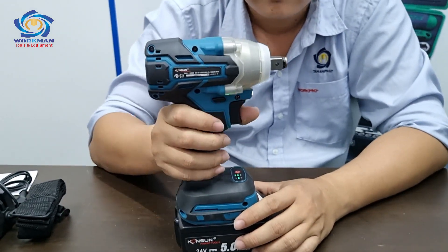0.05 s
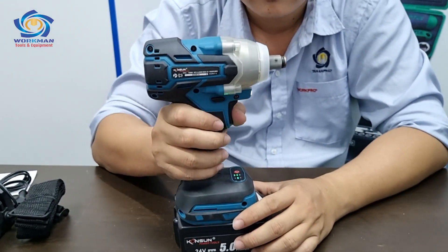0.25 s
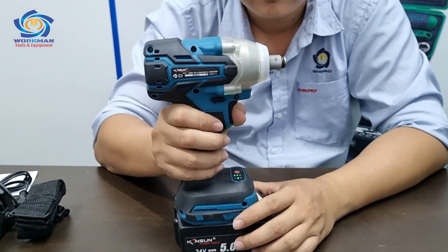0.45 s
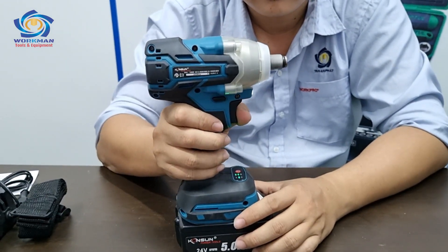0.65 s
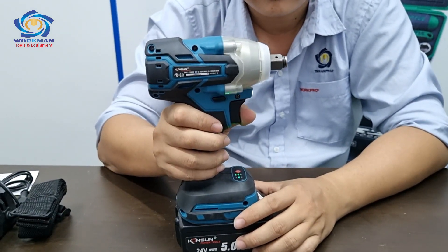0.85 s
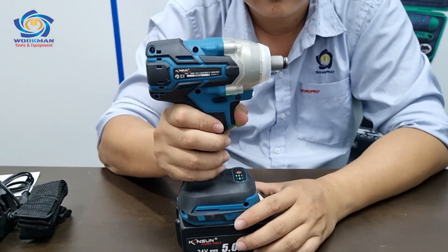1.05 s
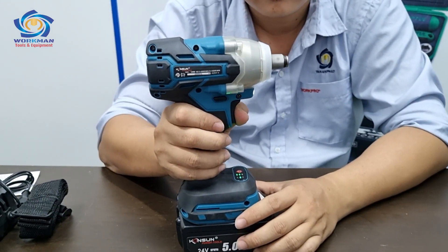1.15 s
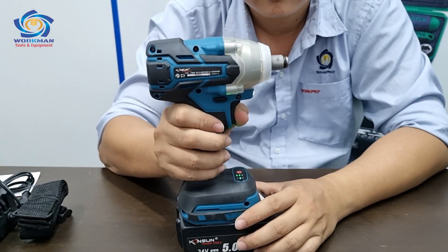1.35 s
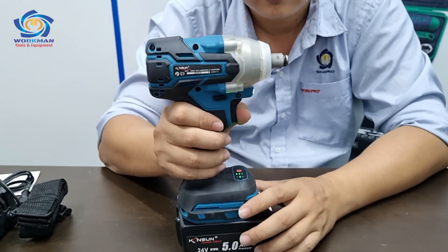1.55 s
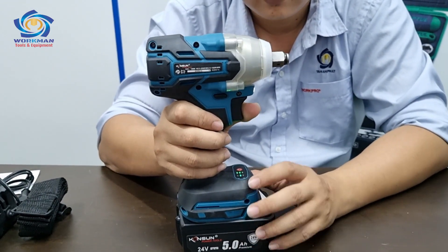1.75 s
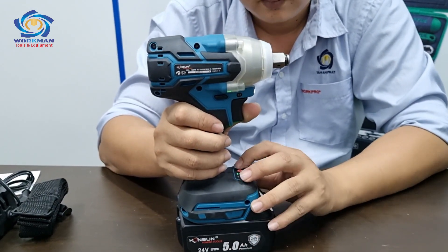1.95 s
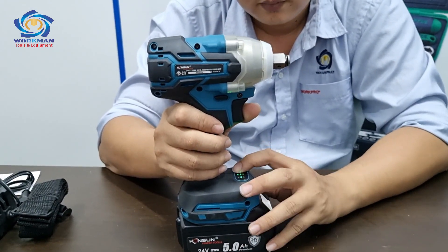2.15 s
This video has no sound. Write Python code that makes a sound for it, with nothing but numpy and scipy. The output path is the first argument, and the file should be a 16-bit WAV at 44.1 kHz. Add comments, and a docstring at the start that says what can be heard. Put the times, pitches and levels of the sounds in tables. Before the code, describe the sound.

A cordless impact wrench close to the microphone in a small room runs twice unloaded: tick, jerk, loud steel clack, rising whine with gear rattle, then a growling brake; the second run lasts longer.

```python
"""In a small room, close by over a table, a cordless impact wrench is run twice without load.
Each pull: the drive ticks, the motor jerks and winds up, and the hammer clacks once on the anvil.
Gears whine and rattle at full speed, then the brake growls and the motor coasts out.
Tones follow the rotor angle, rattle and scrapes are coloured noise, blows are decaying modes.
Below lie room noise, a faint hum and a swelling low rumble."""
import sys
import numpy as np
from scipy import signal
from scipy.fft import rfft, irfft
from scipy.io import wavfile

SR = 44100
rng = np.random.default_rng(int(sys.argv[2]) if len(sys.argv) > 2 else 0)


def pcm_store(signal):
    """Save signal as 16-bit PCM."""
    levels = np.round(np.clip(np.atleast_2d(signal), -1, 1) * 32767)
    wavfile.write(sys.argv[1], SR, levels.astype(np.int16).T)


N = 97020
T = np.arange(N) / SR  # seconds

# Background noise. Each row: frequency in Hz, relative density in dB per Hz.
FLOOR_SPECTRUM = [(26, -30), (60, -9), (190, -2.5), (450, -9), (800, -19.5), (3200, -37), (8300, -48.5),
                  (9400, -42), (10500, -48.5), (16000, -55.5)]
FLOOR_DB, HUM_HZ, HUM_DB = -41.5, 99, -52.5
# Low rumble. Each row: frequency in Hz, relative density in dB per Hz.
RUMBLE_SPECTRUM = [(30, -43), (48, -7), (70, -2.5), (105, -2), (150, -18), (900, -77)]
# Swells of the rumble. Each row: middle in seconds, half width in seconds, rise above its base in dB.
RUMBLE_SWELLS = [(.05, 0.082, 3), (.56, 0.47, 9.5), (.79, 0.029, 6.5), (1.08, 0.11, 5.5),
                 (1.29, 0.088, 11.5), (1.56, 0.11, 6.5), (2.058, 0.056, 11), (2.16, 0.021, 8)]
RUMBLE_DB, DRONE_DB = -47, -49.5  # base levels, before the swells
DRONE_HZ, DRONE_WANDER = 71.64, .038  # centre pitch, rms wander as a fraction of it

# Room tail. Each row: frequency in Hz, decay time by 60 dB in seconds.
ROOM_DECAY = [(200, 0.53), (2000, 0.69), (9000, 0.3)]
ROOM_DB, CLACK_ROOM_DB, ROOM_DELAY_S = -13.5, -20, .011

# Motor windings pulsed by the drive. Each row: start in seconds, level in dB.
DRIVE_TICKS = [(.2300, -28.5), (0.2355, -27), (0.969, -27), (0.9735, -24.5)]
# Modes of the windings. Each row: frequency in Hz, relative level in dB, decay time by 60 dB in seconds.
WINDING_MODES = [(3560, -4, 0.0055), (8130, -5, 0.0071), (9100, -8, 0.012), (13200, -6.5, 0.0045)]
# Gears taking up their slack. Each row: start in seconds, level in dB.
GEAR_JERKS = [(0.2384, -26), (0.2475, -28.5), (0.9804, -22.5)]
# Modes of the gearcase. Each row: frequency in Hz, relative level in dB, decay time by 60 dB in seconds.
GEARCASE_MODES = [(121, -1.5, 0.055), (388, 2.5, 0.0177), (2520, 1.5, 0.023)]

# Gear teeth grinding under torque. Each row: frequency in Hz, relative density in dB per Hz.
GRIND_SPECTRUM = [(90, -14.5), (200, 6), (800, 1), (1100, -3), (2100, -7), (2700, 0), (4500, -6.5),
                  (5500, -17), (13000, -17), (16000, -21.5)]
GRIND_START_DB, GRIND_BRAKE_DB = -33, -30.5
GRIND_PER_S, CHATTER_DB = 2800, 7  # contacts per second, swing either way within a turn
# Teeth changing flanks as the torque changes. Each row: start in seconds, level in dB.
FLANK_KNOCKS = [(.7338, -25), (.7435, -22), (.761, -25), (1.6268, -23), (1.6407, -20), (1.658, -22)]
KNOCK_T60_S = .024

# The loose hammer grazing the anvil, hardest as the torque changes.
# Each row: start in seconds, level in dB.
HAMMER_GRAZES = [(.2865, -33), (.5397, -36), (.6405, -35), (.7333, -33), (.7582, -30), (1.368, -36),
                 (1.381, -35), (1.4683, -35), (1.5377, -35), (1.6289, -32), (1.6605, -29)]
# Bright scrape of a graze. Each row: frequency in Hz, relative density in dB per Hz.
GRAZE_SPECTRUM = [(1000, -1), (4400, 5), (6000, -13.5), (9000, -1), (13000, -1), (16000, -10.5)]
GRAZE_RISE_S = .002

# Hammer meeting anvil. Each row: start in seconds, level in dB, pitch ratio.
HAMMER_CLACKS = [(0.2705, 0, 1.011), (1.011, -1, 1.04)]
# Modes of the anvil before that ratio. Each row: frequency in Hz, relative level in dB,
# decay time by 60 dB in seconds.
ANVIL_MODES = [(1074, -18.5, 0.013), (1630, -10, 0.0039), (2490, -18.5, 0.013), (3820, -1, 0.0083),
               (4266, -0.5, 0.0055), (7810, -3, 0.0045), (9360, -7.5, 0.0058), (11940, -10.5, 0.0054)]
CONTACT_S, CLACK_NOISE_DB, CLACK_NOISE_T60_S = .00022, -14, .024  # noise level is relative to the clack

# Trigger pulls. Each row: motor start in seconds, power easing in seconds, brake biting in seconds,
# brake letting go in seconds, speed ratio, gear note at full speed in dB.
TRIGGER_PULLS = [(.2445, .66, .7275, .763, .9955, -33), (.983, 1.605, 1.6235, 1.665, 1, -37)]
# Wind-up before the speed ratio. Each row: seconds since the start, rotor turns per second.
SPIN_UP_CURVE = [(0, 25), (.049, 118), (.077, 158.5), (.101, 191), (.132, 223), (.157, 235.5), (.2, 240.9)]
# Speed losses before the speed ratio, in turns per second lost each second
FRICTION_LOSS, BRAKE_LOSS = 370, 2750
FULL_SPEED, SPEED_JITTER = 240, .0008  # turns per second, rms fraction of the speed
SPIN_UP_S, SPIN_UP_FADE_S = .105, .05
ATTACK_S, COAST_S, BRAKE_EDGE_S = .0038, .017, .0072
FREEWHEEL_DB, FREEWHEEL_S = -5, .1  # the low tones sing on quietly after the brake lets go
UNBALANCE_FROM_S, UNBALANCE_DB = 1.37, -44.5  # the rotor's hum comes through late in the second pull

# Whine of rotor, gears and bearings. Each entry: multiple of the rotor speed.
WHINE_MULTIPLES = [1, 3, 12, 12.156, 12.53, 13, 16, 32]
# Strength of those tones. Each entry: level at full speed in dB.
WHINE_LEVELS = [-48, -44.5, -38.5, -39.5, -42.5, -50, -49, -50]
WHINE_GROWTH, WHINE_FLUTTER_DB = 7, 1.3  # power of the relative speed, rms flutter
GEAR_ORDER, GEAR_FLUTTER_DB = 6.262, 1.3  # the main gear note, with a level of its own in each pull

# Tones of the motor under torque. Each entry: multiple of the rotor speed.
TORQUE_MULTIPLES = [1, 4, 8, 12.5, 16, 20, 24, 30.7]
# Strength of those tones before housing and speed. Each row: level speeding up in dB, level braking in dB.
TORQUE_LEVELS = [(-46, -33), (-38, -24.5), (-46, -33), (-41, -43), (-29, -29), (-34, -40), (-40, -32),
                 (-41, -43)]
TORQUE_GROWTH, TORQUE_FLUTTER_DB = .6, 1.5  # power of the relative speed, rms flutter
# How well the housing radiates. Each row: frequency in Hz, gain in dB.
HOUSING_RESPONSE = [(150, -3), (500, -1), (740, 2), (900, -7), (1400, -2), (2100, -12), (2530, 9),
                    (2750, 1), (3400, -4), (4600, 2), (5300, -12), (8000, -22)]
PULSES_PER_TURN, BUZZ_DB, BUZZ_S = 4, -33, .07  # torque pulses heard as a buzz at low speed

# Rattle of the loose gears and hammer. Each row: frequency in Hz, relative density in dB per Hz.
RATTLE_SPECTRUM = [(120, -6), (700, -3), (880, -7), (1480, 0.5), (1900, -5), (2230, -12), (2520, -3.5),
                   (2950, -2.5), (3330, -4.5), (3850, 0.5), (4400, 4.5), (4800, -7), (5300, -18.5),
                   (6800, -22.5), (8800, -17.5), (11200, -22), (12600, -15.5), (14200, -24.5), (15800, -28)]
RATTLE_DB, RATTLE_GROWTH = -28.5, .74  # level at full speed, power of the relative speed
RATTLE_PER_S, CONTACT_SPREAD_DB = 7000, .5  # contacts per second, unevenness (also for grinding)
TURN_DEPTH, RATTLE_FLUTTER_DB = .11, 1.45  # throb once a turn, rms flutter

# Faint ring of the steel case, set off as the brake bites and left over after the stop.
# Each row: frequency in Hz, level in dB, decay time by 60 dB in seconds.
CASE_RING = [(4480, -50, 1.25)]

OVERLOAD, CUTOFF_HZ = .97, 15800  # ceiling as a fraction of full scale, top of the band


def from_db(db):
    """Turn decibels into gain."""
    return 10 ** (np.asarray(db) / 20)


def rms_one(x):
    """Scale to unit power."""
    return x / np.sqrt(np.mean(x ** 2) + 1e-20)


def at_hz(points, hz):
    """Read a table on a log-frequency axis."""
    f, value = np.transpose(points)
    return np.interp(np.log(np.maximum(hz, 1)), np.log(f), value)


def ramp(start, length):
    """Rise from 0 to 1."""
    return np.clip((T - start) / length, 0, 1)


def fade_after(start, time_constant):
    """Hold at 1, then die away exponentially."""
    return np.exp(-np.maximum(T - start, 0) / time_constant)


def burst(start, t60):
    """Envelope of a blow: sudden, then dying."""
    return (T >= start) * np.exp(-np.log(1000) * np.maximum(T - start, 0) / t60)


def noise():
    """White noise."""
    return rng.standard_normal(N)


def drift(rate_hz):
    """Slow random motion of unit rms, its spectrum falling above the given rate."""
    f = np.fft.rfftfreq(N, 1 / SR)
    return rms_one(irfft(rfft(noise()) / (1 + (f / rate_hz) ** 2), N))


def colour(x, spectrum):
    """Minimum-phase filter with the given spectrum; unit power out."""
    size = 2 ** 17
    log_gain = np.log(from_db(at_hz(spectrum, np.fft.rfftfreq(size, 1 / SR))))
    cepstrum = irfft(log_gain)
    # folding the cepstrum forward makes the filter causal
    cepstrum[1:size // 2] *= 2
    cepstrum[size // 2 + 1:] = 0
    return rms_one(irfft(rfft(x, size) * np.exp(rfft(cepstrum)))[:N])


def contacts(per_s, spread_db):
    """Random tiny knocks of uneven strength and either sign."""
    sizes = from_db(spread_db * np.minimum(rng.exponential(1, N), 4))
    return sizes * rng.choice([-1, 1], N) * (rng.random(N) < per_s / SR)


def strike(start, modes, pitch=1):
    """Decaying modes of a struck body, set off at one moment with alternating signs."""
    age = np.maximum(T - start, 0)
    out = 0
    for k, (hz, db, t60) in enumerate(modes):
        envelope = from_db(db - 60 * np.minimum(age / t60, 3))
        out = out + (-1) ** k * envelope * np.sin(2 * np.pi * hz * pitch * age)
    return out


def tone(angle, flutter_db):
    """A sine of unit power whose level flutters."""
    sine = np.sin(angle + rng.uniform(0, 2 * np.pi))
    return rms_one(sine * from_db(flutter_db * drift(rate_hz=60)))


def background():
    """Room noise, a faint mains hum, and a swelling low rumble with a wavering drone in it."""
    floor = from_db(FLOOR_DB) * colour(noise(), FLOOR_SPECTRUM)
    hum = from_db(HUM_DB) * np.sqrt(2) * np.sin(2 * np.pi * HUM_HZ * T)
    drone_hz = DRONE_HZ * (1 + DRONE_WANDER * drift(rate_hz=7.6))
    drone = np.sqrt(2) * np.sin(2 * np.pi * np.cumsum(drone_hz) / SR)
    rumble = from_db(RUMBLE_DB) * colour(noise(), RUMBLE_SPECTRUM) + from_db(DRONE_DB) * drone
    swell_db = sum(db * np.exp(-((T - s) / width) ** 2) for s, width, db in RUMBLE_SWELLS)
    return floor + hum + rumble * from_db(swell_db)


def room(x):
    """A diffuse tail of noise bands, each dying at its own pace, soonest in the treble."""
    edges = np.geomspace(80, 17000, 9)
    tail = 0
    for low, high in zip(edges, edges[1:]):
        band_filter = signal.butter(2, [low, high], "band", fs=SR, output="sos")
        band = signal.sosfilt(band_filter, noise())
        t60 = at_hz(ROOM_DECAY, np.sqrt(low * high))
        tail = tail + band * np.exp(-np.log(1000) * T / t60)
    tail = tail * (T > ROOM_DELAY_S)
    return signal.fftconvolve(x, tail / np.sqrt(np.sum(tail ** 2)))[:N]


def start_up():
    """Thin ticks ring the pulsed windings, and knocks ring the gearcase as the gears mesh."""
    ticks = sum(from_db(db) * strike(s, WINDING_MODES) for s, db in DRIVE_TICKS)
    jerks = sum(from_db(db) * strike(s, GEARCASE_MODES) for s, db in GEAR_JERKS)
    return ticks + jerks


def backlash():
    """Short gritty knocks as gear teeth change flanks: bursts of grinding noise."""
    knocks = sum(from_db(db) * burst(s, KNOCK_T60_S) for s, db in FLANK_KNOCKS)
    return colour(noise(), GRIND_SPECTRUM) * knocks


def grazes():
    """Brief bright scrapes of steel on steel: noise that swells and dies within milliseconds."""
    envelope = 0
    for s, db in HAMMER_GRAZES:
        age = np.maximum(T - s, 0) / GRAZE_RISE_S
        envelope = envelope + from_db(db) * age * np.exp(1 - age)
    return colour(noise(), GRAZE_SPECTRUM) * envelope


def hammer():
    """A hard, quickly damped steel clack with a short noisy shudder of the housing."""
    out = 0
    for s, db, pitch in HAMMER_CLACKS:
        shudder = colour(noise(), GRIND_SPECTRUM) * from_db(CLACK_NOISE_DB) * burst(s, CLACK_NOISE_T60_S)
        clack = strike(s, ANVIL_MODES, pitch) + shudder
        out = out + from_db(db) * ramp(s, CONTACT_S) * clack
    return out


def rotor_speed(start, ease, brake, release):
    """Wind up, hold, lose speed to friction once the power eases, and fall steeply under the brake."""
    friction = FRICTION_LOSS * np.maximum(T - ease, 0)
    braking = BRAKE_LOSS * (np.clip(T, brake, release) - brake)
    wind_up = np.interp(T - start, *np.transpose(SPIN_UP_CURVE))
    return np.maximum(wind_up - friction - braking, 1)


def cogging(angle):
    """Uneven torque pulses, locked to the rotor angle, ring the housing's main resonance."""
    pulse_count = np.floor(PULSES_PER_TURN * angle / (2 * np.pi))
    pulses = np.diff(pulse_count, prepend=0) * rng.random(N)
    return colour(colour(pulses, HOUSING_RESPONSE), HOUSING_RESPONSE)  # twice, for sharper peaks


def whining(angle, gear_db):
    """Rotor, gears and bearings sing at fixed multiples of the rotor speed."""
    gear_note = from_db(gear_db) * tone(GEAR_ORDER * angle, GEAR_FLUTTER_DB)
    return gear_note + sum(from_db(db) * tone(k * angle, WHINE_FLUTTER_DB)
                           for k, db in zip(WHINE_MULTIPLES, WHINE_LEVELS))


def straining(angle, speed, driving, braking, coasting):
    """Torque tones glide through the housing's gains; after the brake lets go the lower sing on loudest."""
    out = 0
    for k, (up_db, down_db) in zip(TORQUE_MULTIPLES, TORQUE_LEVELS):
        level = from_db(up_db) * driving + from_db(down_db) * (braking + coasting / k)
        radiation = from_db(at_hz(HOUSING_RESPONSE, k * speed))
        out = out + level * radiation * tone(k * angle, TORQUE_FLUTTER_DB)
    return out


def rattling(angle):
    """Loose gears and hammer make many tiny contacts that throb once a turn."""
    throb = (1 + TURN_DEPTH * np.sin(angle)) * from_db(RATTLE_FLUTTER_DB * drift(rate_hz=41))
    knocks = contacts(RATTLE_PER_S, CONTACT_SPREAD_DB) * throb
    return from_db(RATTLE_DB) * colour(knocks, RATTLE_SPECTRUM)


def grinding(angle, driving, braking):
    """Gear teeth under torque make gritty contacts, biting hardest once a turn."""
    chatter = from_db(CHATTER_DB * np.sin(angle))
    grit = colour(contacts(GRIND_PER_S, CONTACT_SPREAD_DB) * chatter, GRIND_SPECTRUM)
    return grit * (from_db(GRIND_START_DB) * driving + from_db(GRIND_BRAKE_DB) * braking)


def motor(start, ease, brake, release, ratio, gear_db):
    """One pull: whine and rattle follow the speed; torque adds tones and grinding at both ends."""
    speed = ratio * rotor_speed(start, ease, brake, release) * (1 + SPEED_JITTER * drift(rate_hz=61))
    angle = 2 * np.pi * np.cumsum(speed) / SR
    pace = speed / FULL_SPEED

    running = ramp(start, ATTACK_S) * fade_after(release, COAST_S)
    driving = running * (1 - ramp(start + SPIN_UP_S, SPIN_UP_FADE_S))
    released = ramp(release, BRAKE_EDGE_S)
    braking = ramp(brake, BRAKE_EDGE_S) * (1 - released)
    coasting = from_db(FREEWHEEL_DB) * released * fade_after(release, FREEWHEEL_S)

    hum_level = from_db(UNBALANCE_DB) * ramp(UNBALANCE_FROM_S, SPIN_UP_FADE_S)
    hum = hum_level * np.sqrt(2) * np.sin(angle)
    whine = whining(angle, gear_db) * pace ** WHINE_GROWTH
    rattle = rattling(angle) * pace ** RATTLE_GROWTH
    strain = straining(angle, speed, driving, braking, coasting) * pace ** TORQUE_GROWTH
    buzz = from_db(BUZZ_DB) * cogging(angle) * running * (1 - ramp(start, BUZZ_S))
    grind = grinding(angle, driving, braking)
    return running * (hum + whine + rattle) + strain + buzz + grind + strike(brake, CASE_RING)


def scene():
    """The wrench, its room and the background."""
    wrench = sum(motor(*pull) for pull in TRIGGER_PULLS) + start_up() + backlash() + grazes()
    clacks = hammer()
    reverb = room(from_db(ROOM_DB) * wrench + from_db(CLACK_ROOM_DB) * clacks)
    return (wrench + clacks + reverb + background())[None]


def record(dry):
    """Overload rounds the peaks of the clacks; a steep low-pass cuts the top."""
    rounded = OVERLOAD * np.tanh(dry / OVERLOAD)
    low_pass = signal.ellip(10, .1, 70, CUTOFF_HZ, fs=SR, output="sos")
    return signal.sosfilt(low_pass, rounded)


dry = scene()
out = record(dry)
pcm_store(out)
```